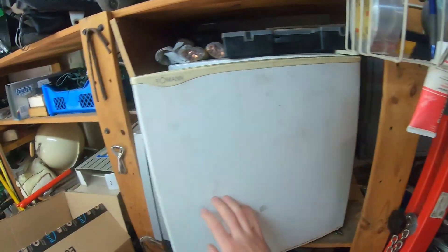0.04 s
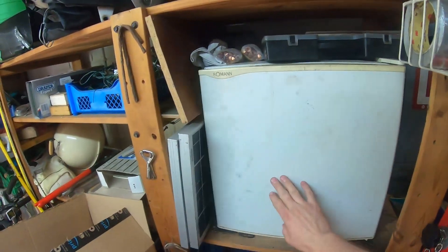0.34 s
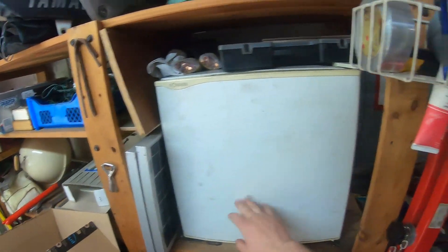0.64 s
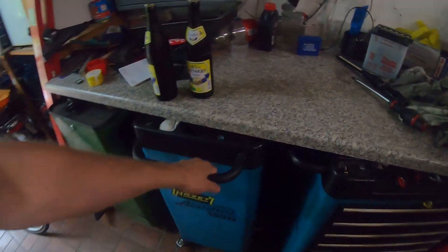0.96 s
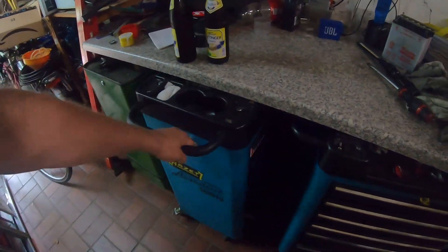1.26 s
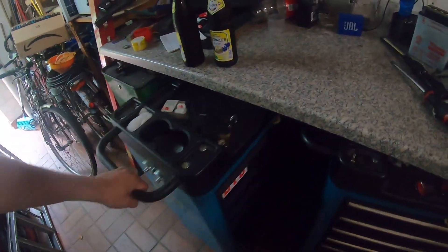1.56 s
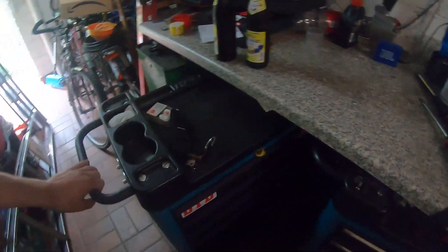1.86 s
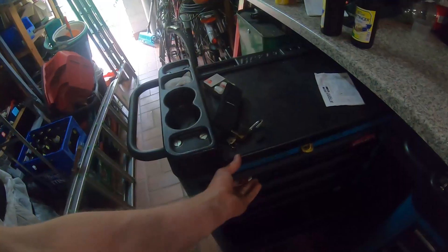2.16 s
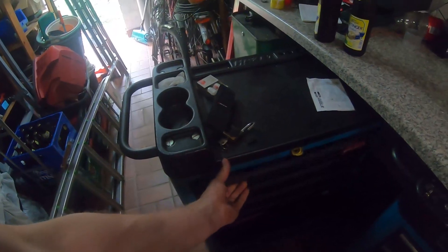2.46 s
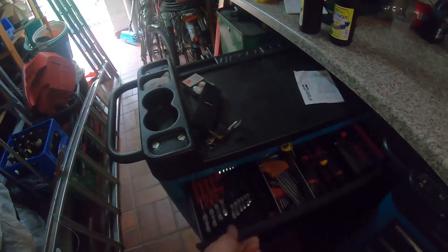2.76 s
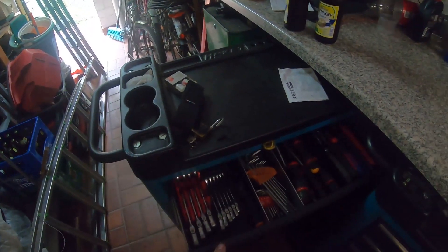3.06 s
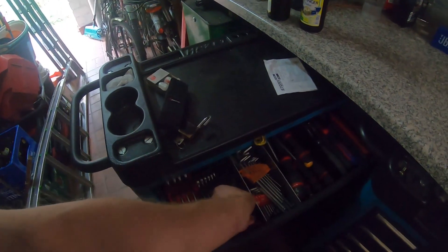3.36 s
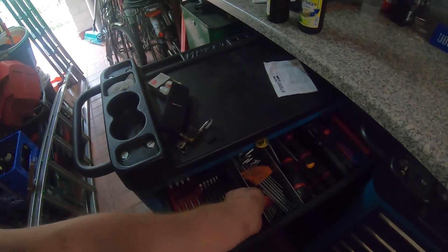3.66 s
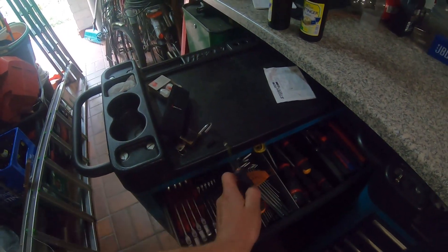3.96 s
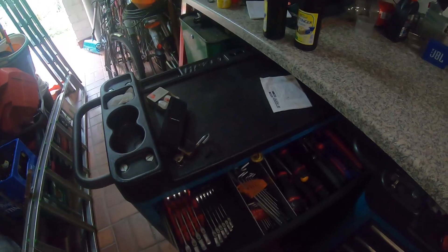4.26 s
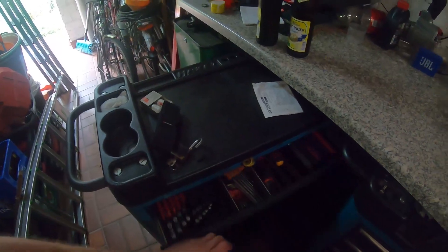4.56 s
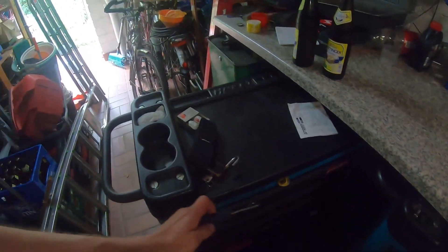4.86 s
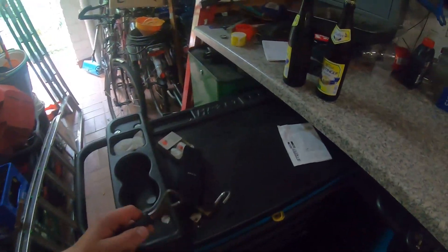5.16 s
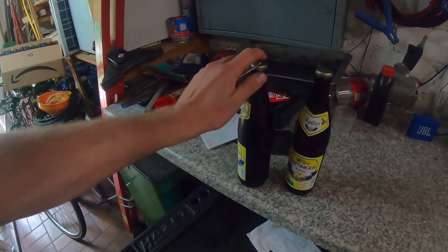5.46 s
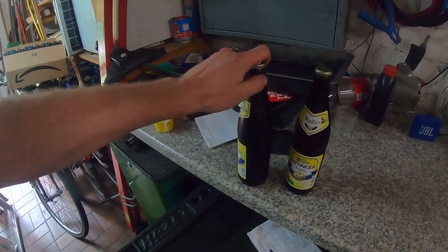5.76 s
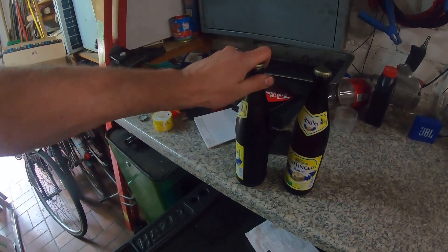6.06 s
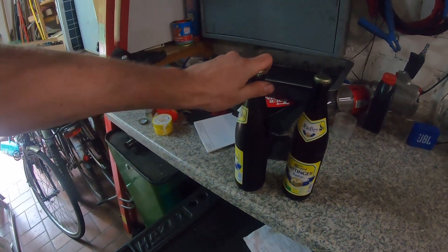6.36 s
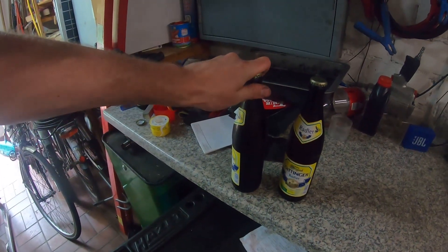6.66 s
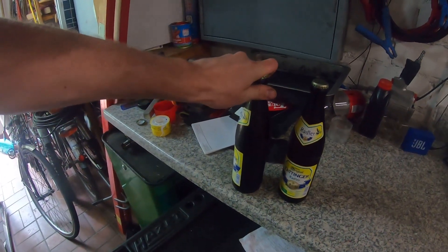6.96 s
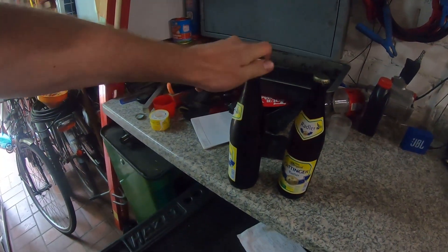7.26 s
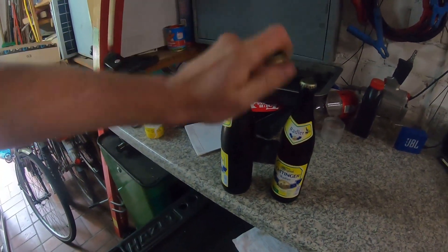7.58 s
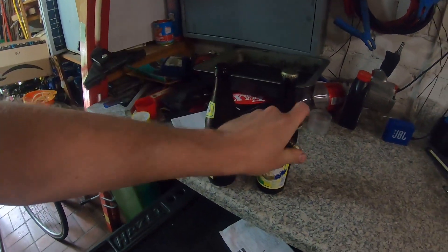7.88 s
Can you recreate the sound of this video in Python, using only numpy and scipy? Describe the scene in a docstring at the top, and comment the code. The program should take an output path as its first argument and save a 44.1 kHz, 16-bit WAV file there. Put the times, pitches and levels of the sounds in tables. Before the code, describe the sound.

Close up, a fridge door thuds, a steel cart drawer opens, tools clack, the drawer slams, and a bottle cap hisses before glass clinks.

```python
"""A steel tool cart in a garage, heard close on a body-worn microphone. A small fridge door slaps shut,
then the cart rolls over tiles, its drawer rattles open, a tool scrapes out and the drawer slams.
Steel taps a bottle neck, the cap is prised until gas hisses out, and a second bottle clinks.
Underneath lie quiet room air and a deep rumble, with a few abrupt, dull low pops over it.
A click and brief low thud open the scene, and faint thin whines pass near the end."""
import sys
import numpy as np
from scipy import signal
from scipy.fft import rfft, irfft, next_fast_len
from scipy.io import wavfile
from scipy.ndimage import uniform_filter1d, map_coordinates

SR = 44100
rng = np.random.default_rng(int(sys.argv[2]) if len(sys.argv) > 2 else 0)


def file_out(sig):
    """Save sig as 16-bit WAV at sys.argv[1]."""
    # one column per channel
    cols = np.atleast_2d(sig).T
    # limit, then scale
    lim = np.clip(cols, -1, 1)
    pcm = np.round(lim * 32767).astype(np.int16)
    wavfile.write(sys.argv[1], SR, pcm)


N = 349272
SIZE = 32768  # samples in one blow or room tail
TIME, AGE = np.arange(N) / SR, np.arange(SIZE) / SR

# reverberation of the garage (frequency [Hz], t60 [s])
GARAGE_DECAY = [(100, 0.54), (400, 0.48), (1500, 0.4), (4000, 0.38), (9000, 0.26), (15000, 0.11)]
# treble, bass and middle (edges [Hz], filter kind)
BANDS = [(1500, "high"), (400, "low"), ([400, 1500], "band")]
# abrupt, dull low pops (time [s], step [full scale])
LOW_POPS = [(0.887, -0.25), (2.1633, -0.17), (3.1638, 0.051), (5.232, 0.034), (7.2933, 0.057)]

# blows; heft adds weight to bass and middle (time [s], level [dB], heft [dB])
DOOR_BLOWS = [(.004, -35, 1.5), (.147, -46.5, 6.5), (.4675, -13.5, -3.5)]  # a click and brief low thud at the very start; last, the door on its frame
CASTOR_BUMPS = [(0.9867, -50, -1), (1.8256, -48, 4.5), (1.9032, -56, 13.5), (2.0649, -33.5, -12),
                (2.19, -58, 10)]  # over tile joints
TOOL_CLACKS = [(2.2922, -49, -8.5), (2.3952, -35, -25), (3.2225, -42, -21.5), (3.4035, -29.5, -11),
               (3.4239, -23, -39.5), (3.5732, -36, -9), (3.6508, -10.5, -15), (3.788, -30, -34),
               (3.9095, -15.5, -37)]
DRAWER_JOLTS = [(2.561, -41, -7), (2.7072, -19, -11.5), (2.7607, -19.5, -19.5), (2.8067, -16, -26.5),
                (2.8459, -23.5, -16.5), (2.9668, -18, -19), (3.08, -57.5, 21.5), (3.142, -40, -16),
                (4.728, -29.5, -14.5)]
DRAWER_SLAMS = [(2.9395, -18, -13.5), (4.957, -12.5, -10)]  # on its stops, out and home
CAP_PRISES = [(5.5684, -60.5, 19.5), (5.6531, -61, -3), (5.8162, -44, -16.5), (5.901, -40, -18),
              (7.3402, -53, 11.5)]
# steel touching glass (time [s], level [dB])
NECK_TAPS = [(5.2362, -34.5), (5.3273, -43), (5.4354, -51)]
WALL_TAPS = [(7.635, -51), (7.7725, -38), (7.7989, -26)]

# rubs of hand and swivelling castors (start [s], end [s], swish [dB], scrape [dB])
CART_SCUFFS = [(0.111, 0.239, -51, -61), (1.16, 1.29, -53, -42.5), (1.318, 1.406, -51, -76),
               (1.435, 1.49, -41, -50.5), (1.721, 1.758, -58, -72), (1.88, 1.917, -52, -46.5)]
# movements (start [s], end [s], level [dB])
TOOL_DRAGS = [(3.603, 3.642, -49), (3.635, 3.66, -25.5), (3.685, 3.792, -35.5)]
DRAWER_GLIDES = [(2.56, 3.114, -45.5), (4.512, 4.852, -52)]  # out and in
DRAWER_JERKS = [(2.6203, 2.653, -22), (4.852, 4.871, -21)]  # past the catch
# faint tones (peak time [s], half length [s], frequency [Hz], level [dB])
WHINES = [(6.978, 0.16, 399, -67.5), (7.09, 0.064, 1183, -69), (7.095, 0.1, 1585, -73)]

# resonances of the bodies (frequency [Hz], width [Hz], relative level [dB])
CABINET_MODES = [(53.3, 29, -7), (109.6, 31, -4), (187, 35, -5), (660, 100, -2.5), (746, 94, 11),
                 (1050, 960, -0.5), (1810, 180, 3.5)]
SHEET_MODES = [(85.3, 19, -8.5), (103.5, 48, -2), (195, 20, -1), (305, 33, 1.5), (465, 8.2, -12.5),
               (703, 68, -10.5), (764, 66, -7.5), (1035, 68, 0.5), (1274, 91, -4), (3220, 300, -3.5),
               (4590, 140, -2), (8240, 120, 2.5)]
TOOL_MODES = [(1194, 29, 1), (2020, 190, 2.5), (2610, 38, 2), (3220, 75, 6), (3790, 39, 5.5),
              (4920, 38, -2.5), (5240, 38, 0.5), (6100, 57, -8.5), (7590, 91, 1), (8950, 140, 0),
              (10330, 69, 0)]
CAP_MODES = [(314.7, 23, 4.5), (520, 40, -6), (673, 54, 2.5), (1380, 22, 10.5), (2115, 33, 0),
             (6070, 32, -17), (8840, 50, 8), (9280, 21, 9.5), (10500, 36, 2), (12900, 28, -7)]
# modes of the bottles (frequency [Hz], relative level [dB], t60 [s])
NECK_MODES = [(1394, 3.5, 0.15), (1988, -7.5, 1), (3890, -9.5, 0.87), (4000, 13, 0.087), (4452, -21, 0.22),
              (6360, -6, 0.16), (7980, -8, 0.23), (8600, -1, 0.14)]
WALL_MODES = [(2480, -5, 0.065), (3330, 5, 0.033), (3800, 8.5, 0.028), (3890, -11, 0.22), (4060, -10, .15),
              (7720, 8, 0.039), (7950, -7, 0.28)]

# broad spectra of the sources (frequency [Hz], relative level [dB])
AIR_TONE = [(41, -46), (70, 3), (113, -21.5), (300, -17.5), (403, -21), (431, -23), (1170, -24.5),
            (1280, -28), (1580, -27.5), (1850, -29), (16000, -39.5)]
RUMBLE_TONE = [(1, -11.5), (4, 1.5), (9, -7), (13, -12), (20, -20.5), (30, -41), (60, -51), (120, -60.5),
               (300, -120)]
DOOR_TONE = [(21, -53), (35, 11.5), (111, -5), (159, -13), (258, -12.5), (334, -19.5), (617, -3),
             (907, -13), (1720, -32.5), (2340, -32.5), (6040, -33), (8430, -29.5), (16000, -52)]
GRIT_TONE = [(880, -44.5), (1500, 5.5), (1690, -12), (2000, 0.5), (2190, -5), (3000, -1), (8400, -2.5),
             (16000, -15.5)]
SCRAPE_TONE = [(350, -16.5), (600, -9.5), (1020, -9.5), (1400, -4.5), (1510, -17), (1710, -1.5),
               (2000, -11.5), (4810, -12.5), (6000, -20), (7800, -54), (13200, -120)]
WHEEL_TONE = [(53, -39.5), (90, -1.5), (188, -3), (222, -4.5), (484, -0.5), (588, -8), (857, -13),
              (1390, -19.5), (2500, -14.5), (3250, -47), (5500, -120)]
TOOL_TONE = [(59, -44), (100, -11.5), (249, -2), (520, -3), (910, 3.5), (1010, 0), (2000, -6), (2930, -9),
             (3320, -3.5), (6840, -12.5), (8830, -9.5), (16000, -34)]
DRAWER_TONE = [(18, -26), (30, -3), (38, -9.5), (93, -7), (138, -9.5), (189, -2.5), (252, -8), (303, -5.5),
               (364, -11), (461, -5.5), (600, -8.5), (2680, -21), (8080, -23), (16000, -33.5)]
TICK_TONE = [(410, -32), (700, -14.5), (1640, -18), (2430, -10), (2730, -12.5), (3940, -0.5), (4700, -13),
             (5920, -14.5), (7890, -12), (8990, -18.5), (16000, -35)]
CAP_TONE = [(71, -39), (120, 3), (684, -6), (1580, -21.5), (1720, -13), (1980, -31), (2110, -22),
            (5520, -29.5), (8660, -28.5), (16000, -42)]
GAS_TONE = [(710, -39), (1200, -29), (1660, -22.5), (3950, -19), (4600, -10.5), (5180, -12), (6870, -4.5),
            (7660, -5.5), (8440, -1), (14000, -10.5), (16000, -18)]


def amp(db):
    """Decibels to gain."""
    return 10 ** (np.asarray(db) / 20)


def unit(x):
    """Scale to rms 1."""
    return x / np.sqrt(np.mean(x ** 2) + 1e-20)


def punch(x):
    """Scale so that the loudest hundredth of a second has rms 1."""
    return x / np.sqrt(uniform_filter1d(x ** 2, SR // 100).max() + 1e-20)


def along(points, hz):
    """Read a curve on a log frequency axis."""
    knots_hz, values = np.transpose(points)
    return np.interp(np.log(hz + .01), np.log(knots_hz + .01), values)


def add(track, s, sound):
    """Mix a sound in at a time."""
    part = track[max(round(s * SR), 0):][:len(sound)]
    part += sound[:len(part)]


def split(x, edge, kind):
    """The treble, bass or middle of a sound."""
    return signal.sosfilt(signal.butter(3, edge, kind, fs=SR, output="sos"), x)


def stroke(start, end, db, rise, t60, db_per_s=0):
    """Envelope of a movement: it rises, holds on a slope and dies away after its end."""
    held = np.clip(TIME - start, 0, end - start)
    return (1 - np.exp(-held / rise)) * amp(db + db_per_s * held - 60 * np.maximum(TIME - end, 0) / t60)


def wobble(rate):
    """A smooth random curve, rate knots a second."""
    return map_coordinates(rng.standard_normal(400), [TIME * rate], mode="wrap")


def grains(rate, spread_db=0, size=N):
    """Tiny contacts of uneven strength at random moments, about rate a second."""
    contacts = (rng.random(size) < rate / SR) * rng.standard_normal(size)
    return unit(contacts * amp(spread_db * rng.standard_normal(size)))


def coloured(x, spectrum):
    """Steady excitation given a spectrum, at rms 1."""
    size = next_fast_len(N + SR)
    gain = amp(along(spectrum, np.fft.rfftfreq(size, 1 / SR)))
    return unit(irfft(rfft(x, size) * gain, size)[:N])


def body(spectrum, modes=(), ring_db=0):
    """Impulse response of an object: a broad colour with resonances standing out of it."""
    hz = np.fft.rfftfreq(SIZE, 1 / SR)
    lift = 1 + sum(amp(ring_db + db) ** 2 / (1 + (2 * (hz - centre) / width) ** 2)
                   for centre, width, db in modes)
    gain = amp(along(spectrum, hz)) * np.sqrt(lift)
    cepstrum = irfft(np.log(np.maximum(gain, 1e-6)))
    cepstrum[1:SIZE // 2] *= 2  # folding makes the response causal
    cepstrum[SIZE // 2:] = 0
    return irfft(np.exp(rfft(cepstrum)))[:SIZE // 2]


def excite(response, force):
    """A body or room answering a force."""
    return signal.fftconvolve(force, response)[:len(force)]


def garage(x, wet_db):
    """The direct sound plus a diffuse room tail whose treble dies first."""
    hz, t, spectra = signal.stft(rng.standard_normal(SIZE), SR, nperseg=256)
    decay = amp(-60 * t / along(GARAGE_DECAY, hz)[:, None])
    tail = signal.istft(spectra * decay, SR, nperseg=256)[1][:SIZE]
    tail *= 1 - np.exp(-AGE / 0.0011)
    return x + amp(wet_db) * excite(tail / np.linalg.norm(tail), x)


def blows(rows, response, rate, t60, rise, low_linger, high_db, low_db, mid_db, wet_db,
          first_db=-20, mid_share=0.66):
    """Each blow is a first contact and a chatter that builds and dies; the heavy bass moves longest."""
    out = np.zeros(N)
    lingers = (1, low_linger, np.sqrt(low_linger))
    for s, level, heft in rows:
        contacts = grains(rate, spread_db=-2, size=SIZE) * (1 - np.exp(-AGE / rise))
        band_dbs = (high_db, low_db + heft, mid_db + mid_share * heft)
        sound = 0
        for band, db, linger in zip(BANDS, band_dbs, lingers):
            chatter = contacts * amp(-60 * AGE / (t60 * linger))
            chatter[0] += amp(first_db) * np.linalg.norm(chatter)
            sound += amp(level + db) * punch(split(excite(response, chatter), *band))
        add(out, s, garage(sound, wet_db))
    return out


def deep_rumble(standing_db=-24):
    """A slow pressure sway, mostly below hearing, stronger while the wearer walks."""
    walking = stroke(start=0.66, end=1.9, db=-18.5, rise=0.62, t60=1.5)
    return (amp(standing_db) + walking) * coloured(rng.standard_normal(N), RUMBLE_TONE)


def fridge_door(puff_db=-31, puff_s=0.01, shudder_db=-31, shudder_t60=0.4):
    """A click and brief low thud open the scene; then the door puffs out air and slaps on its seal, and the
    cabinet shudders."""
    cabinet = body(DOOR_TONE, CABINET_MODES, ring_db=10)
    slap = blows(DOOR_BLOWS, cabinet, rate=22000, t60=0.02, rise=0.00024, low_linger=6.5,
                 high_db=-2, low_db=-0.5, mid_db=-2, wet_db=-9.5, first_db=0.5)
    since_shut = TIME - DOOR_BLOWS[-1][0]
    puff = amp(puff_db) * np.exp(-np.abs(since_shut) / puff_s)
    shudder = (since_shut > 0) * amp(shudder_db - 60 * np.abs(since_shut) / shudder_t60)
    return slap + (puff + shudder) * unit(excite(cabinet, rng.standard_normal(N)))


def cart(pull_s=(0.9, 2.22), lump_db=3.5, judder_db=2.5):
    """A rubbing hand and hard castors on gritty tiles: scuffs, a lumpy rumble, bumps at the joints."""
    frame = body(WHEEL_TONE, SHEET_MODES, ring_db=7)
    rolling = unit(excite(frame, grains(rate=900, spread_db=1.5)))
    pull = stroke(*pull_s, db=-55.5, rise=0.11, t60=2.4) * amp(lump_db * wobble(rate=12))
    swish = stroke(*pull_s, db=-68, rise=0.035, t60=0.25)  # grit under the castors
    scrape = 0
    for start, end, swish_db, scrape_db in CART_SCUFFS:
        swish += stroke(start, end, swish_db, rise=0.055, t60=0.31)
        scrape += stroke(start, end, scrape_db, rise=0.055, t60=0.31)
    scrape *= amp(judder_db * wobble(rate=67))
    swish *= coloured(grains(rate=14000, spread_db=3), GRIT_TONE)
    scrape *= coloured(grains(rate=1300, spread_db=2), SCRAPE_TONE)
    sheet = body(DRAWER_TONE, SHEET_MODES, ring_db=6)
    bumps = blows(CASTOR_BUMPS, sheet, rate=6200, t60=0.077, rise=0.001, low_linger=2,
                  high_db=-9, low_db=-0.5, mid_db=0, wet_db=-10)
    return garage(pull * rolling + swish + scrape, wet_db=-8) + bumps


def low_pops(settle_s=0.06):
    """Each dull pop is an abrupt step that settles back to zero."""
    out = np.zeros(N)
    pop = np.exp(-AGE / settle_s) * (1 - np.exp(-AGE / 0.00003))
    for s, step in LOW_POPS:
        add(out, s, step * pop)
    return out


def tool_clacks():
    """Loose steel tools knock together and ring."""
    steel = body(TOOL_TONE, TOOL_MODES, ring_db=4.5)
    return blows(TOOL_CLACKS, steel, rate=10000, t60=0.061, rise=0.0013, low_linger=1.54,
                 high_db=-10, low_db=-3.5, mid_db=-6.5, wet_db=-13, mid_share=0.5)


def drawer(shake_db=0.5, boom_db=-3, boom_hold_s=0.014, boom_top_hz=175):
    """The sheet-steel drawer drones on ball slides, jolts, shakes its contents and slams on its stops."""
    sheet = body(DRAWER_TONE, SHEET_MODES, ring_db=4)
    running = excite(sheet, grains(rate=3800))
    high, low, mid = (unit(split(running, *band)) for band in BANDS)
    glide = sum(stroke(*row, rise=0.059, t60=0.2, db_per_s=-11) for row in DRAWER_GLIDES)
    slides = glide * (low + amp(-1) * mid + amp(-12) * high)

    jumble = excite(body(DRAWER_TONE, SHEET_MODES, ring_db=6), grains(rate=2600))
    high, low, mid = (unit(split(jumble, *band)) for band in BANDS)
    shake = sum(stroke(*row, rise=0.01, t60=0.37) for row in DRAWER_JERKS)
    shake *= amp(shake_db * wobble(rate=70))
    contents = shake * (amp(-7) * low + mid + amp(-2) * high)

    jolts = blows(DRAWER_JOLTS, sheet, rate=4000, t60=0.096, rise=0.0032, low_linger=1.12,
                  high_db=-11, low_db=0.5, mid_db=-0.5, wet_db=-7.5, mid_share=0.52)
    slams = blows(DRAWER_SLAMS, sheet, rate=9000, t60=0.056, rise=0.0018, low_linger=1.7,
                  high_db=-13, low_db=2, mid_db=-3.5, wet_db=-4.5)
    # the whole cart shudders after each slam, more after a heavier one
    shudder = sum(stroke(s, s + boom_hold_s, level + heft + boom_db, rise=0.0066, t60=0.59)
                  for s, level, heft in DRAWER_SLAMS)
    boom = shudder * unit(split(running, boom_top_hz, "low"))
    return slides + contents + jolts + slams + boom


def tool_scrape(neighbours=3, detune=0.014, touch_db=4.5, edge_hz=5000):
    """A tool leaving its tray rubs on others of slightly different sizes; light contact keeps it bright."""
    drag = sum(stroke(*row, rise=0.0046, t60=0.1) for row in TOOL_DRAGS)
    jangle = 0
    for _ in range(neighbours):
        pitch = np.exp(detune * rng.standard_normal())
        steel = body(TOOL_TONE, [(hz * pitch, width, db) for hz, width, db in TOOL_MODES], ring_db=8.5)
        touch = amp(touch_db * wobble(rate=40))
        jangle += touch * excite(steel, grains(rate=600))
    bright = signal.sosfilt(signal.butter(1, edge_hz, "high", fs=SR, output="sos"), jangle)
    return garage(drag * unit(bright), wet_db=-8.5)


def clinks(taps, modes, ring_db, tick_db, tick_t60, wet_db):
    """Each tap is a hard tick that rings the glass modes at slightly new strengths."""
    out = np.zeros(N)
    for s, db in taps:
        ring = 0
        for hz, level, t60 in modes:
            decay = amp(level + rng.normal(0, 2.6) - 60 * AGE / t60)
            ring += decay * np.sin(2 * np.pi * hz * AGE + rng.uniform(0, 2 * np.pi))
        tick = excite(body(TICK_TONE), rng.standard_normal(SIZE) * amp(-60 * AGE / tick_t60))
        clink = amp(ring_db) * punch(ring) + amp(tick_db) * punch(tick)
        add(out, s, amp(db) * garage(clink, wet_db))
    return out


def bottles():
    """Steel taps the neck of one bottle and later the wall of another."""
    neck = clinks(NECK_TAPS, NECK_MODES, ring_db=-5, tick_db=-4.5, tick_t60=0.049, wet_db=-9.5)
    wall = clinks(WALL_TAPS, WALL_MODES, ring_db=-10.5, tick_db=-9, tick_t60=0.0071, wet_db=-22)
    return neck + wall


def cap_creaks():
    """The crown cap creaks and gives under the lever."""
    cap = body(CAP_TONE, CAP_MODES, ring_db=6.5)
    return blows(CAP_PRISES, cap, rate=4000, t60=0.051, rise=0.00074, low_linger=3.9,
                 high_db=-3.5, low_db=-2, mid_db=4.5, wet_db=-5.5)


def gas_hiss():
    """The seal parts and gas hisses through the widening gap until the pressure is spent."""
    flow = stroke(start=6.535, end=6.655, db=-55.5, rise=0.003, t60=0.1, db_per_s=172)
    return garage(flow * coloured(rng.standard_normal(N), GAS_TONE), wet_db=-7.5)


def whines():
    """Thin tones swell and fade, barely above the air of the room."""
    return sum(amp(db) * np.exp(-((TIME - s) / half) ** 2) * np.sin(2 * np.pi * hz * TIME)
               for s, half, hz, db in WHINES)


def scene():
    """All sounds, in mono, over the quiet air of the garage."""
    air = amp(-62) * coloured(rng.standard_normal(N), AIR_TONE)
    mix = air + deep_rumble() + fridge_door()
    mix += cart() + low_pops() + tool_clacks() + drawer() + tool_scrape()
    mix += bottles() + cap_creaks() + gas_hiss() + whines()
    return mix[None]


def record(dry, top_hz=16000):
    """The microphone chain cuts off steeply at its band limit."""
    return signal.sosfilt(signal.ellip(10, .1, 80, top_hz, fs=SR, output="sos"), dry)


dry = scene()
out = record(dry)
file_out(out)
```